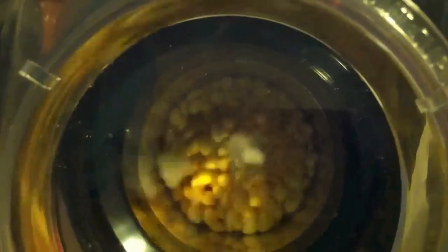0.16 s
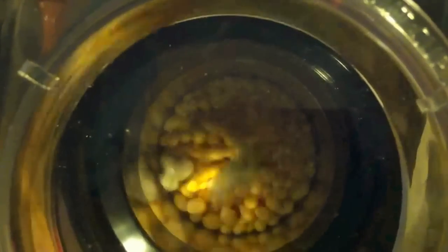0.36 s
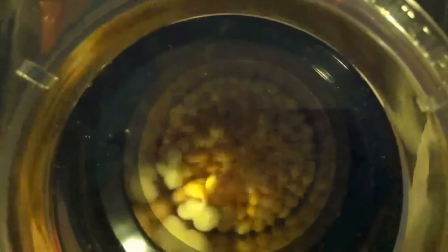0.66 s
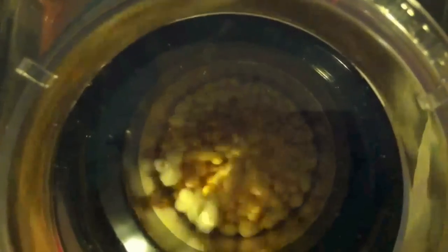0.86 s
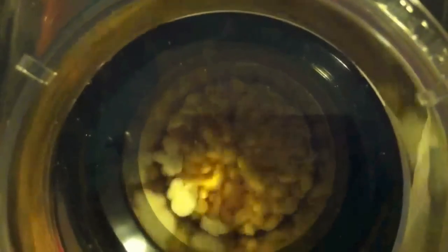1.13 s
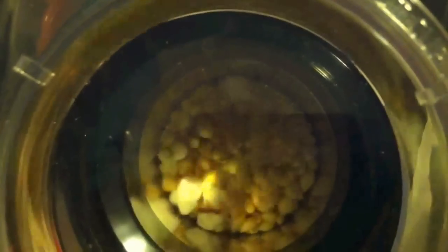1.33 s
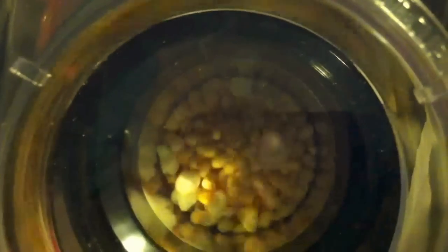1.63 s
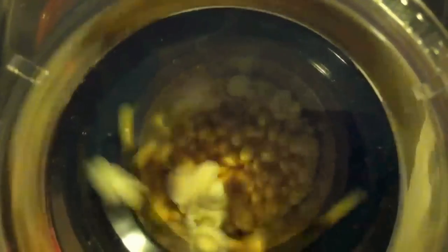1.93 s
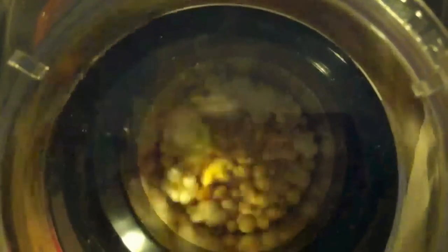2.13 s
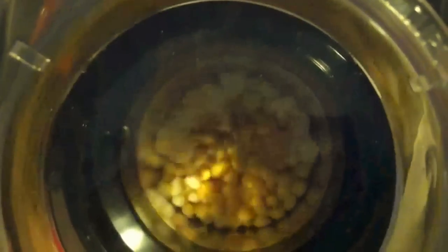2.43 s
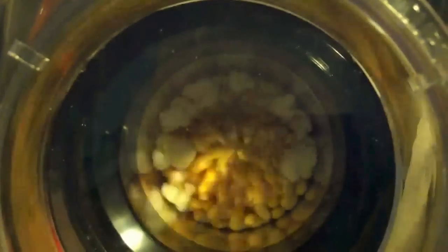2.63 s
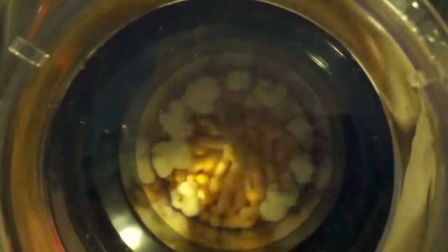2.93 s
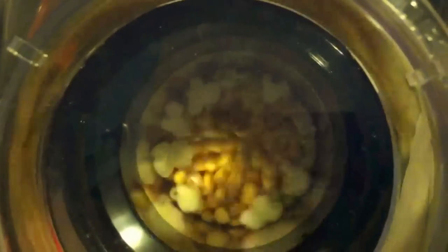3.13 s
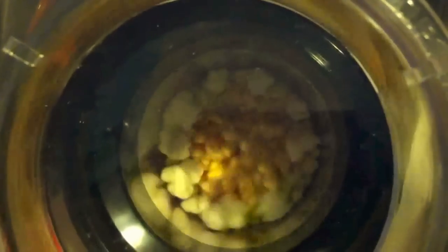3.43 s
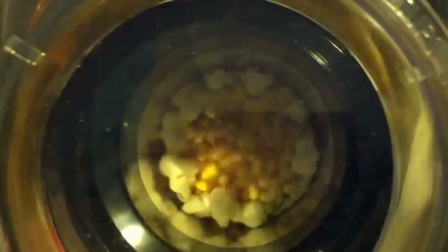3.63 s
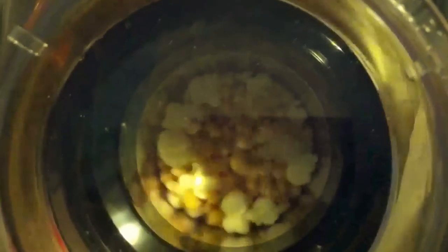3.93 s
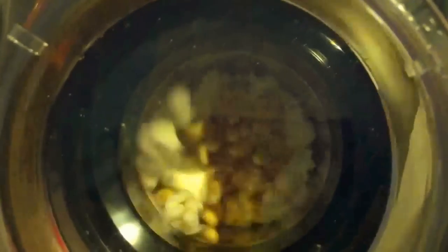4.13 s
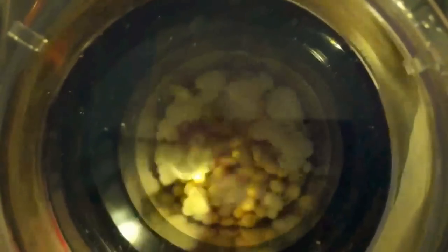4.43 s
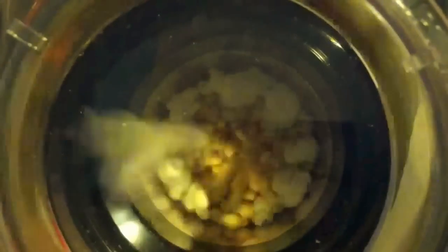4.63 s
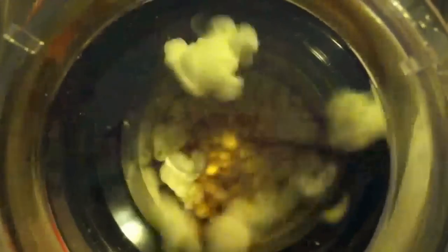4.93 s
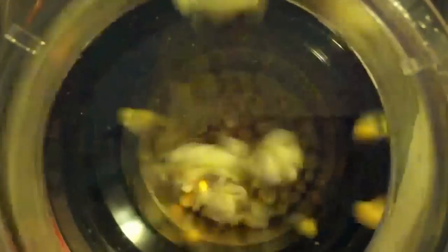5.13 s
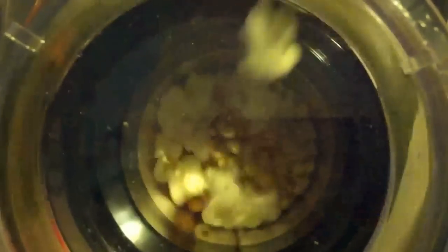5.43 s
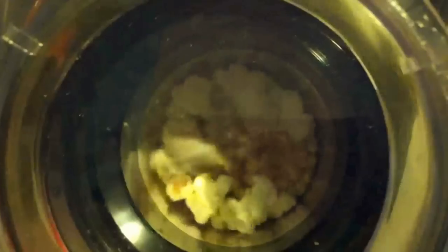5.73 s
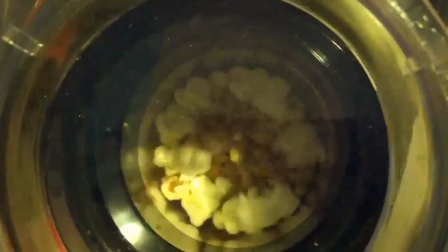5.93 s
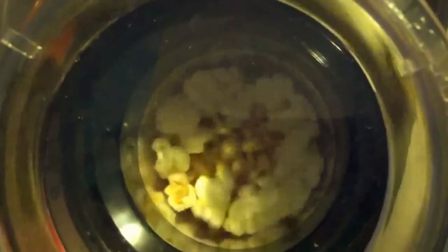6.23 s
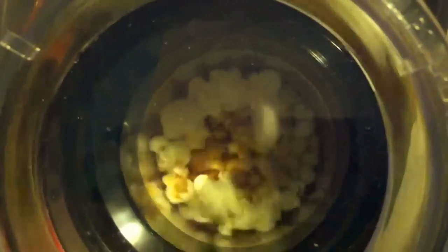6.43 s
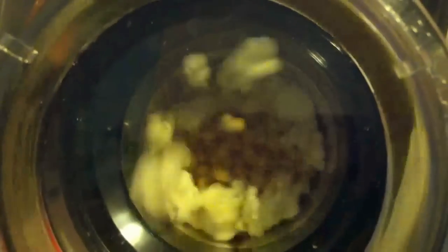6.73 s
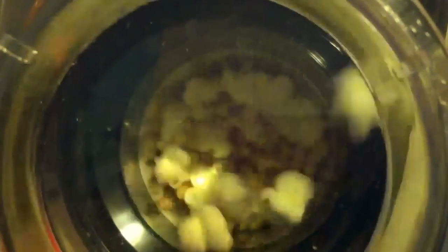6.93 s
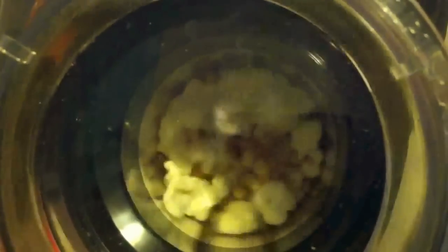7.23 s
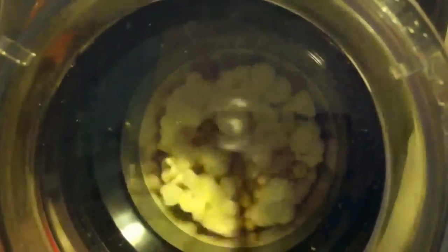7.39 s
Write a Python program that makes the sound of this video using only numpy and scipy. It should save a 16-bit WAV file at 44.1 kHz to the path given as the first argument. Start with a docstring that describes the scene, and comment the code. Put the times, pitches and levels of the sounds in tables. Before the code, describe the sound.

Very close microphone over a small popping machine, dry with only tiny chamber echoes. The motor hums and whines beneath a hollow rush of air, and countless hard kernels rattle into a grainy hiss. Isolated crisp pops start early on, some with dull thuds of the plastic housing. A tight cluster peaks with one piercing crack midway; a quieter gap follows, then several more pops near the end over a slightly softer roar.

```python
"""A hot-air popcorn popper, with one microphone just above its open chamber.
From the start the fan hums in harmonics and roars as filtered noise, and kernels rattle as random knocks.
From 1.9 s hulls crack as short noise jets that ring the chamber, and low modes thud in the housing.
A bare kernel clacks at 4.6 s; the loudest crack comes at 5.0 s, and loud ones make the recorder duck the fan.
Pops gather again from 6.7 s; the rattle softens with every burst, and the roar sinks by 2 dB."""
import sys
import numpy as np
from scipy import signal
from scipy.fft import rfft, irfft
from scipy.io import wavfile
from scipy.ndimage import uniform_filter1d, map_coordinates

SR = 44100
rng = np.random.default_rng(int(sys.argv[2]) if len(sys.argv) > 2 else 0)


def master_out(mix):
    """Clip the mix to full scale and print it as 16-bit PCM to the path in sys.argv[1]."""
    frames = np.transpose(np.atleast_2d(mix))
    ceiling = np.clip(frames, -1, 1)
    pcm = np.round(ceiling * 32767).astype(np.int16)
    wavfile.write(sys.argv[1], SR, pcm)


N = 333396
TIME = np.arange(N) / SR  # s

# Bursts of the cracking hulls, one row a burst; the first pop is a double burst: t/s, level/dB,
# tilt/dB per octave (well above 1500 Hz), burst length/s, the hull's own pitch f/Hz, pitch of the ring (ratio)
BURST_EVENTS = [(1.8815, -13.5, -4.5, 0.0025, 11000, 1), (1.883, -15, -1, 0.0052, 3600, 1),
                (1.9095, -21, -2, 0.0048, 11000, 1), (2.4095, -20.5, -2, 0.0031, 5200, 1),
                (2.9913, -16, -3.5, 0.0022, 6500, 1), (4.2735, -22, -3, 0.0025, 10000, 1),
                (4.318, -19.5, -6, .004, 5000, 1), (4.841, -12, -6, 0.0095, 1500, .99),
                (4.8908, -17, -4.5, 0.0035, 3200, 1), (5.001, -2.5, -2, 0.0024, 5300, 1.005),
                (5.879, -18, 0, 0.0039, 5000, 1), (6.7166, -6, -5, 0.0045, 5600, .982),
                (6.7575, -17, 2, .006, 5200, 1), (6.8349, -8.5, -2.5, 0.0035, 6300, 1.005),
                (7.0916, -17, 7, 0.0058, 5000, 1), (7.388, -20.5, -1, 0.0062, 12950, 1)]
# A hull bursting, spectrum before the tilt: f/Hz, relative level/dB per Hz
CRACK_SPECTRUM = [(30, -46), (80, -36), (140, -24), (400, -17.5), (900, -15.5), (2300, -8.5), (3500, -9.5),
                  (7000, -10), (9000, -9), (12000, -12), (13500, -17), (16000, -44)]
# Ring of the chamber and its metal wall under a burst, at ratio 1: f/Hz, width/Hz, boost level/dB
WALL_RING = [(252, 130, 10), (1000, 230, -9), (1610, 430, 10.5), (2400, 480, -5), (2920, 180, -3),
             (3450, 420, 9), (3860, 270, 13), (4220, 380, -10), (4680, 130, 9.5), (5025, 280, 13.5),
             (5880, 220, -9), (6330, 390, 9), (6850, 200, 8.5), (7160, 200, -1), (7880, 390, 8.5),
             (8450, 650, -5.5), (9100, 270, 2.5), (10050, 290, 6)]
# Hard kernels flung against the others: t/s, level/dB, skid length/s
KNOCK_EVENTS = [(4.6248, -18, 0.012)]
# Bare kernels clacking on each other: f/Hz, relative level/dB per Hz
CLACK_SPECTRUM = [(1000, -39), (2000, -8), (2400, -2.5), (2850, -1), (3300, -8.5), (4200, -7), (7000, -36),
                  (16000, -60)]
# Dull knocks that shake the housing, most from a pop: t/s, level/dB, tilt/dB per octave,
# level of the push of air/dB
THUD_EVENTS = [(1.884, -28, -5, -44), (4.144, -28, 0, -60), (4.615, -28, 0, -60), (4.839, -17, 4.5, -55),
               (5.002, -19, 2, -46), (6.722, -43, -8, -44), (6.829, -33, -4, -36), (7.088, -38, -8, -40)]
# Low modes of the plastic housing, before the tilt: f/Hz, relative level/dB, t60/s
HOUSING_MODES = [(72, -20, 0.048), (161, -1.5, 0.089), (200, -3, 0.075), (307, 7, 0.06), (385, -5, .05)]
# Hard kernels ticking on the wall: f/Hz, relative level/dB per Hz
TICK_SPECTRUM = [(300, -29), (1200, -5), (2050, -8.5), (2600, -4.5), (3400, -3.5), (5000, -1.5), (6000, -7),
                 (7500, -7), (9500, -13), (11700, -14.5), (13000, -22), (14200, -36), (15000, -49),
                 (16000, -50)]
# Air resonances of the chamber, on roar and rattle: f/Hz, width/Hz, boost level/dB
CHAMBER_RESONANCES = [(319, 61, 7), (371, 11, -3.5), (392.7, 14.6, 9), (424.2, 13, 9), (590, 44, 1.5),
                      (727, 33, 1.5), (798, 33, -4.5), (845, 81, 7.5), (957, 95, 5.5), (1120, 41, 2.5),
                      (1293, 31, 5.5), (1450, 71, 6), (1624, 160, 3.5), (1778, 100, 7.5), (1940, 64, 4),
                      (2270, 130, 4.5), (2510, 130, 2.5), (2620, 62, 4.5), (3226, 304, 9), (3630, 490, 3.5),
                      (4414, 71, 6.5), (5000, 220, 4), (5420, 240, 7), (6500, 260, 2.5), (6880, 240, 3.5),
                      (9870, 250, 4.5)]
# Hum and whine of the fan, before they waver: multiple of the blade rate, level/dB rms
HUM_HARMONICS = [(1, -26), (2, -38), (3, -35.5), (4, -31), (5, -52), (6, -48), (7, -45), (8, -42.5),
                 (9, -45), (10, -45), (11, -44.5), (12, -45), (13, -46), (14, -44.5), (15, -44), (16, -44),
                 (18, -48.5), (20, -46), (25, -45.5), (28, -48.5), (30, -54), (31, -52), (36, -56),
                 (39, -54)]
# Harmonics that the heap favours until it shifts: multiple, start t/s, end t/s, extra level/dB
FAVOURED_HARMONICS = [(12, -1.5, 2, 7), (11, 0.5, 4.8, 3), (3, 5, 7.56, 4), (5, 0, 2, 11),
                      (8, 1.5, 3.8, 4.5), (20, -0.5, 1.2, 4.5), (39, -3, 2.7, 2)]
# Rushing air: f/Hz, relative level/dB per Hz
AIR_SPECTRUM = [(25, -48), (65, -59), (100, -46.5), (155, -26.5), (210, -21.5), (300, -20), (500, -15),
                (620, -9.5), (780, -6.5), (1080, -7.5), (1320, -22.5), (1800, -22.5), (2100, -31),
                (8000, -65)]
# Roar through the heap, muffled late by popped corn, before gusts and swells: t/s, level/dB rms
ROAR_LEVEL = [(0, -18), (4.9, -18), (6.6, -18.2), (7.0, -19), (7.56, -20)]
# Moments when the core of the roar swells: t/s, extra level/dB, half length/s
ROAR_SWELLS = [(0.392, 2, .012), (1.783, 5, 0.0077), (1.852, 6.5, 0.011), (2.945, 1, 0.011),
               (3.241, 2, 0.012), (3.287, 3.5, .028), (3.523, 6, .014), (3.666, 4.5, 0.011),
               (4.477, 3.5, .012), (5.418, 4, .02), (7.16, 3.5, 0.053)]

# Rattle at the start (dB rms, before it surges); soft popped corn cushions it, counted by the burst
TICK_DB, TICK_LOSS_DB_PER_BURST = -27, 0.18
CLACK_DB, CLACK_LOSS_DB_PER_BURST = -35.5, 0.07
# The blade rate creeps up as the motor runs warm
BLADE_START_HZ, CREEP_HZ_PER_S = 232.1, 0.15
# The heap takes this long to shift
SHIFT_S = 0.35
# Wander of the roar's resonances as the heap tumbles: rms share of their pitch, and its rate
SWAY, SWAY_HZ = 0.00599, 4.96
# Echoes are duller than the direct blow
ECHO_TILT_DB_PER_OCTAVE = -2
# Upper band limit of the recorder
EDGE_HZ = 15900


def pops(hull_db=5.5, hull_width=0.48):
    """Hulls split with jets of steam that ring hull and chamber, at a pitch set by where each lay."""
    out = np.zeros(N)
    for s, db, tilt_db, length_s, hull_hz, pitch in BURST_EVENTS:
        ring = [(hz * pitch, width, boost) for hz, width, boost in WALL_RING]
        hull = (hull_hz, hull_width * hull_hz, hull_db)
        add(out, s, db, blow(length_s, CRACK_SPECTRUM, [*ring, hull], tilt_db))
    return out


def knocks(kernel_hz=3300, kernel_width_hz=700, kernel_db=9):
    """A flung kernel lands on the bare ones with a soft, narrow clack."""
    out = np.zeros(N)
    for s, db, skid_s in KNOCK_EVENTS:
        kernel = (kernel_hz, kernel_width_hz, kernel_db)
        add(out, s, db, blow(skid_s, CLACK_SPECTRUM, [kernel]))
    return out


def blow(length_s, spectrum, resonances, tilt_db=0, echo_db=-7.5, echo_t60=0.074,
         room_db=-21, room_t60=0.17, echo_colour=0.39, rise_s=0.00027):
    """A short noise jet excites the resonances; echoes arrive from all sides, so their colour is broader."""
    t = np.arange(SR // 5) / SR
    jet = np.exp(-(t / length_s) ** 4)
    near_decay = amp(echo_db - 60 * t / echo_t60)
    room_decay = amp(room_db - 60 * t / room_t60)
    echoes = (1 - jet) * (near_decay + room_decay)
    # weaker boosts leave the echoes less strongly coloured
    blurred = [(hz, width, echo_colour * boost) for hz, width, boost in resonances]
    jet_noise = even_burst(jet * (1 - np.exp(-t / rise_s)))
    direct = colour(jet_noise, spectrum, resonances, tilt_db)
    return direct + colour(even_burst(echoes), spectrum, blurred, tilt_db + ECHO_TILT_DB_PER_OCTAVE)


def thuds(rise_s=0.0072, push_s=0.0028):
    """Short, low modes of the plastic housing swell softly beside a push of air."""
    t = np.arange(SR // 5) / SR
    out = np.zeros(N)
    for s, db, tilt_db, push_db in THUD_EVENTS:
        modes = np.zeros(len(t))
        for hz, mode_db, t60 in HOUSING_MODES:
            # a positive tilt favours the upper modes
            decay = amp(mode_db + tilt_db * np.log2(hz) - 60 * t / t60)
            modes += decay * np.sin(2 * np.pi * hz * t)
        add(out, s, db, modes * (1 - np.exp(-t / rise_s)))
        push = t * (2 - t / push_s) * np.exp(-t / push_s)
        add(out, s, push_db, push)
    return out


def rattle(spectrum, start_db, loss_db_per_burst, ticks_per_s=12000, spread_db=0.34, surge_db=0.5):
    """Countless small knocks of swirling kernels merge into a gritty hiss that surges as the heap tumbles."""
    ticks = (rng.random(N) < ticks_per_s / SR) * rng.choice([-1, 1], N)
    sizes = amp(spread_db * np.minimum(rng.exponential(1, N), 5))
    hiss = unit(colour(ticks * sizes, spectrum, CHAMBER_RESONANCES))
    level_db = start_db - loss_db_per_burst * bursts_so_far() + surge_db * drift(30)
    return amp(level_db) * hiss


def bursts_so_far():
    """Counts the bursts so far, a measure of the soft corn that cushions the rattle."""
    burst_times = np.sort([row[0] for row in BURST_EVENTS])
    return np.searchsorted(burst_times, TIME)


def hum(wobble_hz=0.216, steady_waver=0.034, whine_waver=0.36, whine_rate_hz=16,
        flutter_turns=0.06, flutter_hz=12, fade_db=1.3, fade_hz=2):
    """Blade-rate harmonics; turbulence makes the upper ones waver and flutter, the lowest stays firm."""
    blade_hz = BLADE_START_HZ + CREEP_HZ_PER_S * TIME + wobble_hz * drift(4.96)
    angle = 2 * np.pi * np.cumsum(blade_hz) / SR
    out = np.zeros(N)
    for multiple, db in HUM_HARMONICS:
        if multiple == 1:
            waver, flutter, fading_db = steady_waver * drift(3.5), 0, 0
        else:
            waver = whine_waver * drift(whine_rate_hz)
            flutter = flutter_turns * drift(flutter_hz)
            fading_db = fade_db * drift(fade_hz)
        level = amp(db + favour_db(multiple) + fading_db) * np.sqrt(2) * (1 + waver)
        phase = 2 * np.pi * (rng.random() + flutter)
        out += level * np.cos(multiple * angle + phase)
    return out


def favour_db(multiple):
    """The extra level that the heap lends a harmonic, easing in and out as the heap shifts."""
    total = np.zeros(N)
    for order, start, end, extra_db in FAVOURED_HARMONICS:
        if order == multiple:
            step = float(extra_db) * (TIME >= start) * (TIME < end)
            total += uniform_filter1d(step, round(SHIFT_S * SR))
    return total


def air(gust_db=0.5, gust_hz=20, core_hz=900, core_width_hz=450):
    """Turbulent air sounds the chamber's resonances, which sway in pitch as the heap tumbles."""
    roar = unit(colour(rng.standard_normal(N), AIR_SPECTRUM, CHAMBER_RESONANCES))
    # reading the noise at a varying speed sways its resonances
    read_at = np.cumsum(1 + SWAY * drift(SWAY_HZ))
    swayed = map_coordinates(roar, [read_at], mode="mirror")
    core = signal.lfilter(*signal.iirpeak(core_hz, core_hz / core_width_hz, fs=SR), swayed)
    swell_db = sum(db * np.exp(-((TIME - s) / half_s) ** 2) for s, db, half_s in ROAR_SWELLS)
    swollen = swayed + (amp(swell_db) - 1) * core
    level_db = np.interp(TIME, *np.transpose(ROAR_LEVEL)) + gust_db * drift(gust_hz)
    return amp(level_db) * swollen


def amp(db):
    """Decibels to gain."""
    return 10 ** (np.asarray(db) / 20)


def unit(x):
    """Scales to rms 1."""
    return x / np.sqrt(np.mean(x ** 2) + 1e-20)


def drift(rate_hz, size=8192):
    """Slow random motion of rms 1, its spectrum fading out above the given rate."""
    hz = np.fft.rfftfreq(size, N / SR / size)
    slowness = (hz > 0) / (1 + (hz / rate_hz) ** 2)
    coarse = unit(irfft(rfft(rng.standard_normal(size)) * slowness, size))
    return np.interp(TIME, np.linspace(0, N / SR, size), coarse)


def colour(x, spectrum, resonances, tilt_db=0, size=8192):
    """Gives x a source's spectrum and a body's resonances, through a causal filter of energy 1."""
    hz = np.fft.rfftfreq(size, 1 / SR) + 1
    points_hz, points_db = np.transpose(spectrum)
    db = np.interp(np.log(hz), np.log(points_hz), points_db)
    db = db + tilt_db * np.log2(1 + hz / 1500)
    db = db + sum(boost / (1 + (2 * (hz - f) / width) ** 2) for f, width, boost in resonances)
    # minimum phase: the Hilbert transform of the log gain gives the phase
    log_gain = np.log(amp(np.concatenate([db, db[-2:0:-1]])))
    taps = np.fft.ifft(np.exp(np.conj(signal.hilbert(log_gain)))).real
    return signal.fftconvolve(x, taps / np.linalg.norm(taps))[:len(x)]


def even_burst(envelope, count=8):
    """Noise under an envelope, smoothed in spectrum so that it strikes all resonances alike."""
    x = envelope * rng.standard_normal(len(envelope))
    for _ in range(count):
        # flatten the spectrum, then restore the envelope
        white = irfft(np.exp(1j * np.angle(rfft(x))), len(x))
        x = envelope * np.cos(np.angle(signal.hilbert(white)))
    return np.sqrt(2) * x


def add(mix, s, db, sound):
    """Puts a short sound into the mix; its level is its energy spread over 4 ms."""
    level_span = 0.004 * SR  # samples
    part = mix[round(s * SR):][:len(sound)]
    part += amp(db) * np.sqrt(level_span) * sound[:len(part)] / np.linalg.norm(sound)


def scene():
    """Pops, swirling kernels and fan sum in the air at one microphone."""
    ticking = rattle(TICK_SPECTRUM, TICK_DB, TICK_LOSS_DB_PER_BURST)
    clacking = rattle(CLACK_SPECTRUM, CLACK_DB, CLACK_LOSS_DB_PER_BURST)
    return (pops() + knocks() + thuds() + ticking + clacking + hum() + air())[None]


def gain_control(x, sense_hz=2000, window_s=0.0048, threshold_db=-14.5, slope=0.59, recovery_db_per_s=3.0):
    """Bright peaks pull the gain down, from half a window ahead; it creeps back at a steady dB rate."""
    treble = signal.sosfilt(signal.butter(2, sense_hz, "high", fs=SR, output="sos"), x)
    power = uniform_filter1d(treble ** 2, round(window_s * SR))
    power_db = 10 * np.log10(abs(power) + 1e-12)
    wanted_cut_db = slope * np.maximum(power_db - threshold_db, 0)
    # a running maximum on a rising ramp holds each cut and lets it recover
    recovery_db = recovery_db_per_s * TIME
    cut_db = np.maximum.accumulate(wanted_cut_db + recovery_db) - recovery_db
    return x * amp(-cut_db)


def record(dry, low_cut_hz=40):
    """The recorder's gain control, overload near full scale, then the bass cut and the band limit."""
    limited = np.clip(gain_control(dry[0]), -0.9, 0.9)
    thinned = signal.sosfilt(signal.butter(2, low_cut_hz, "high", fs=SR, output="sos"), limited)
    band_limit = signal.firwin(511, EDGE_HZ, window=("kaiser", 9), fs=SR)
    return signal.oaconvolve(thinned, band_limit, "same")[None]


dry = scene()
out = record(dry)
master_out(out)
```